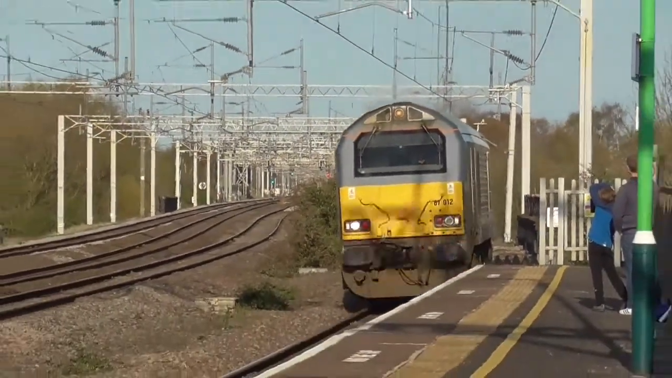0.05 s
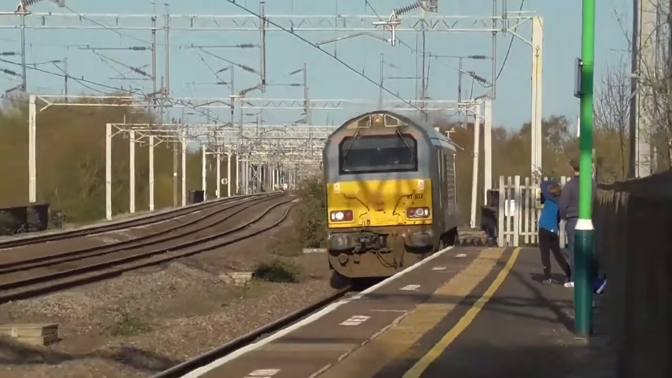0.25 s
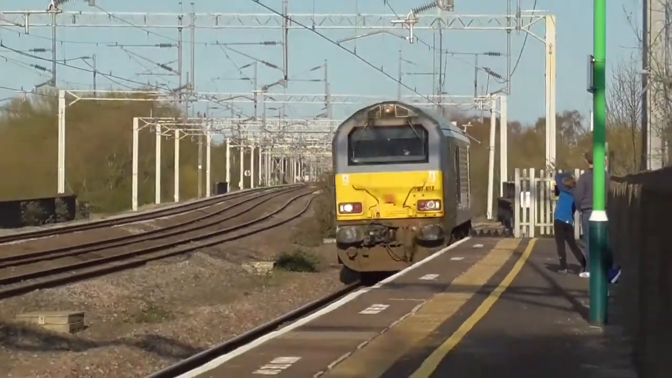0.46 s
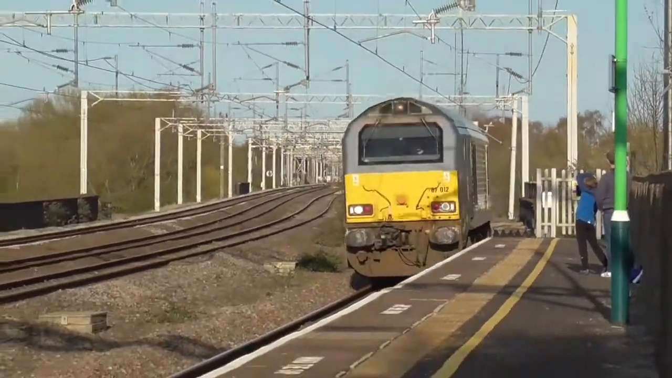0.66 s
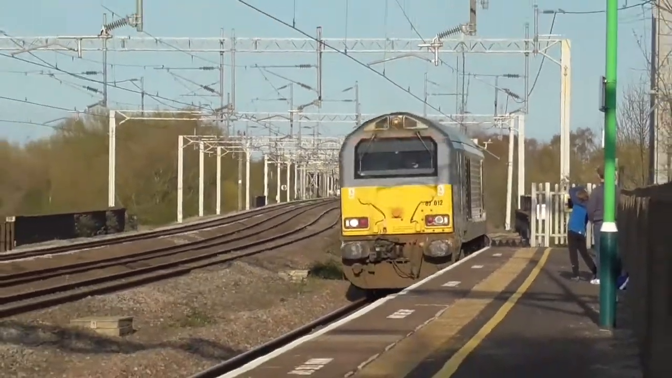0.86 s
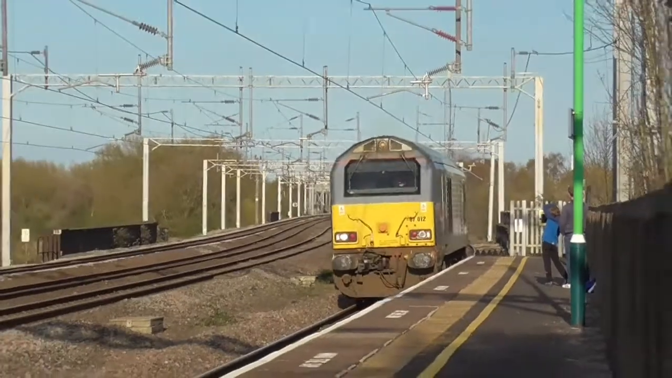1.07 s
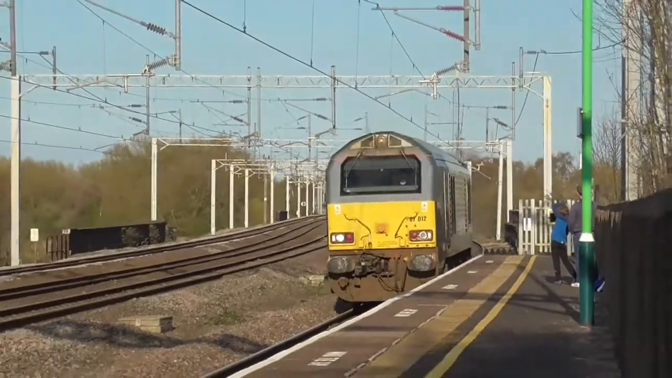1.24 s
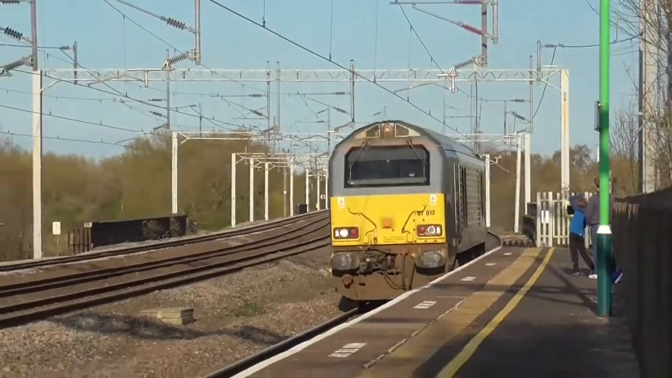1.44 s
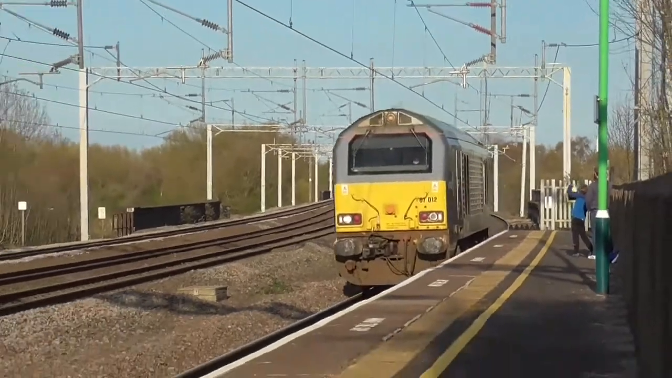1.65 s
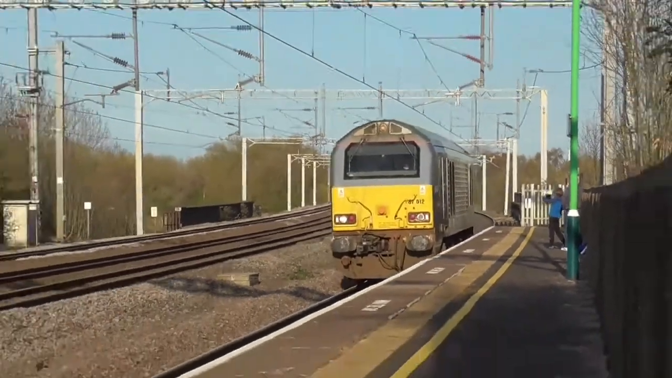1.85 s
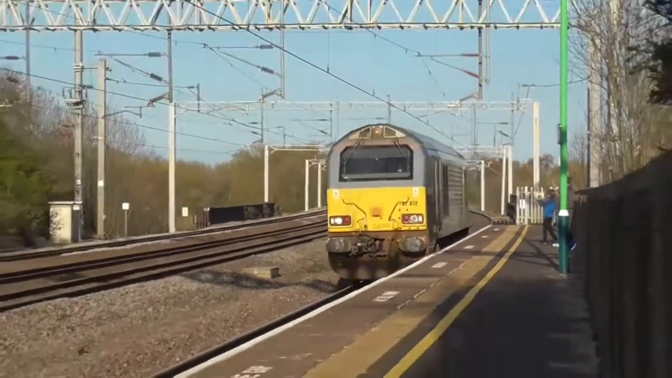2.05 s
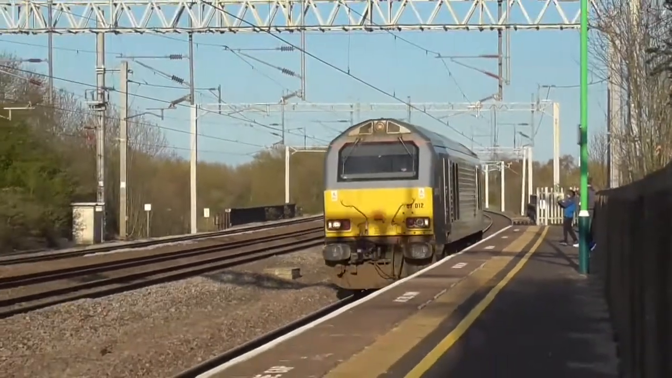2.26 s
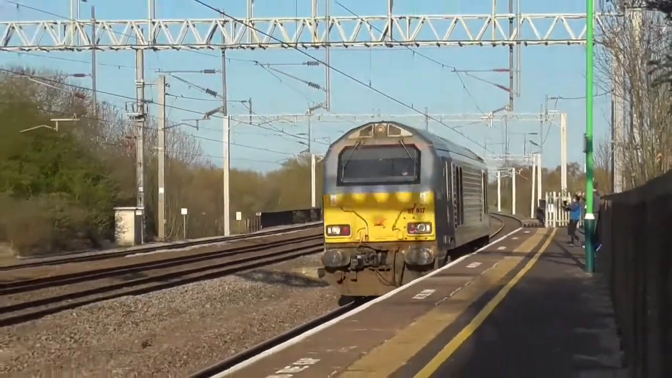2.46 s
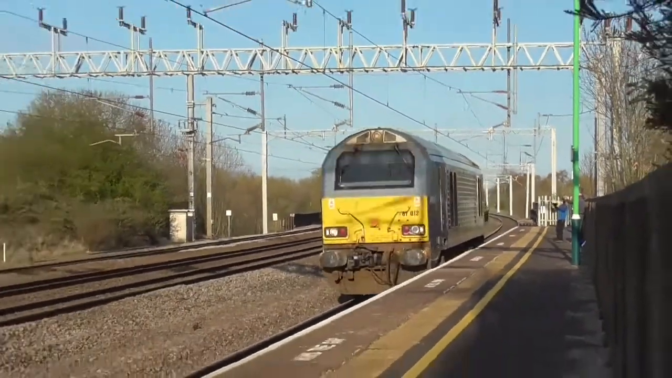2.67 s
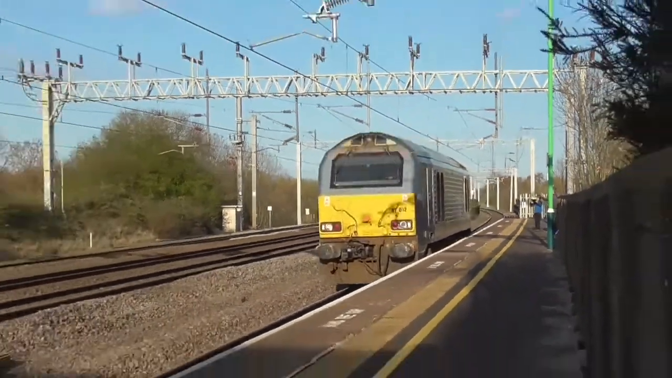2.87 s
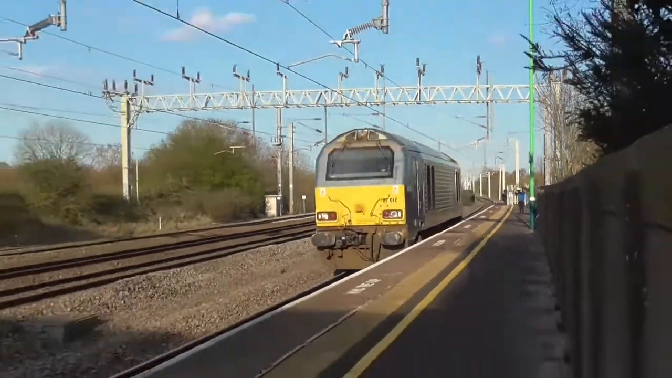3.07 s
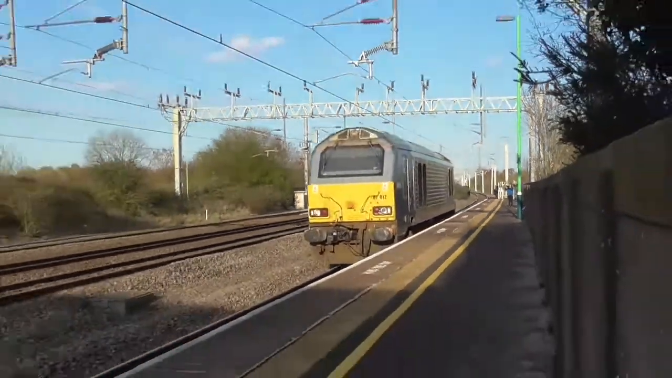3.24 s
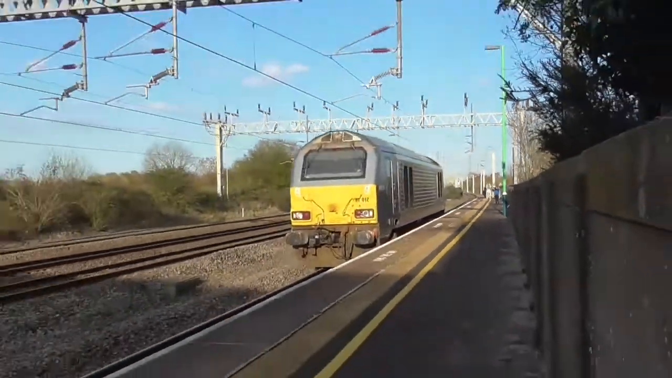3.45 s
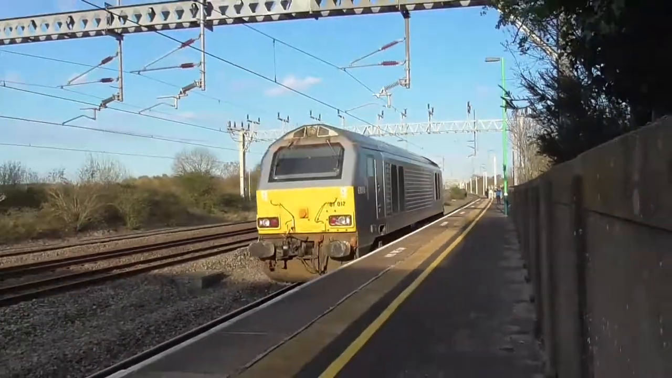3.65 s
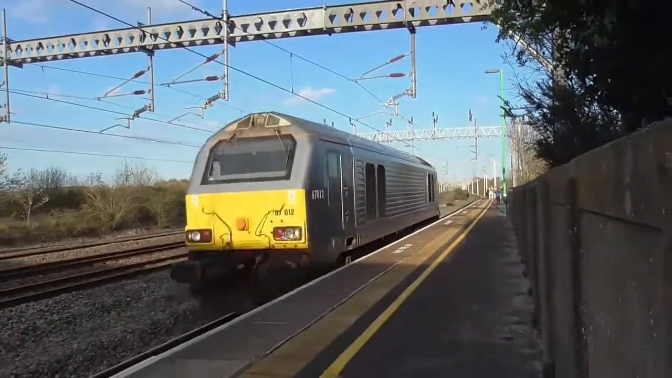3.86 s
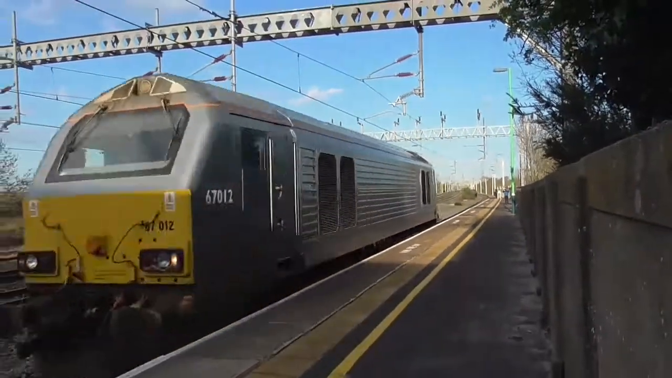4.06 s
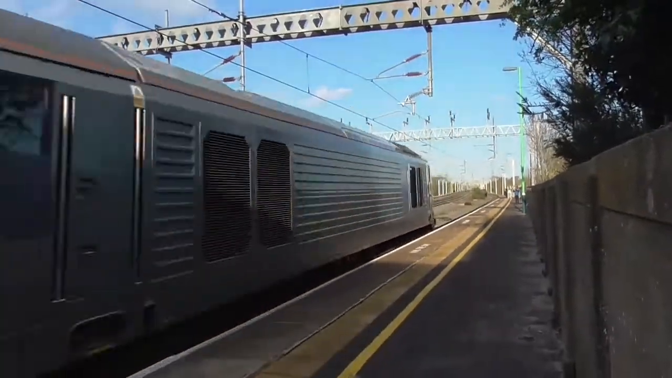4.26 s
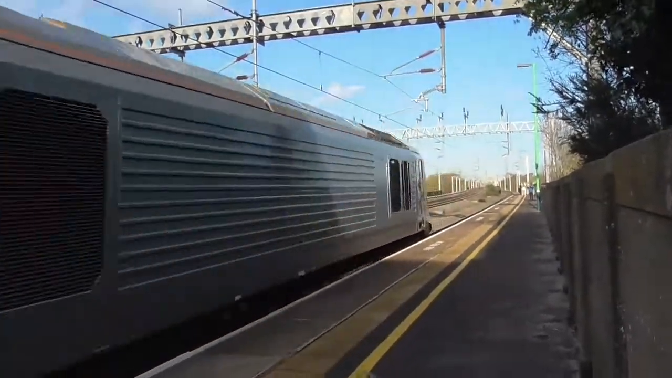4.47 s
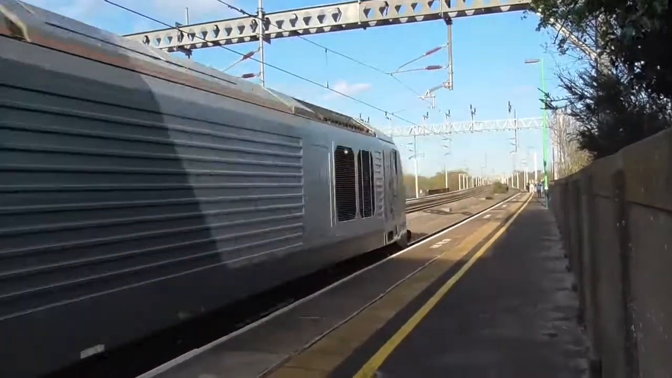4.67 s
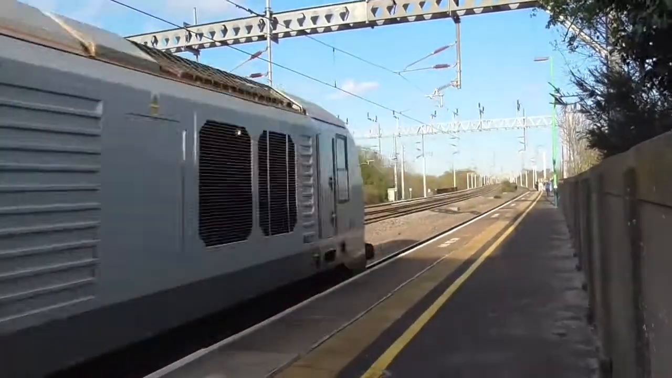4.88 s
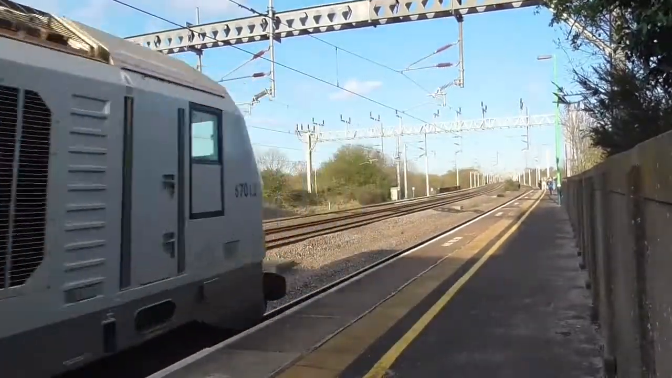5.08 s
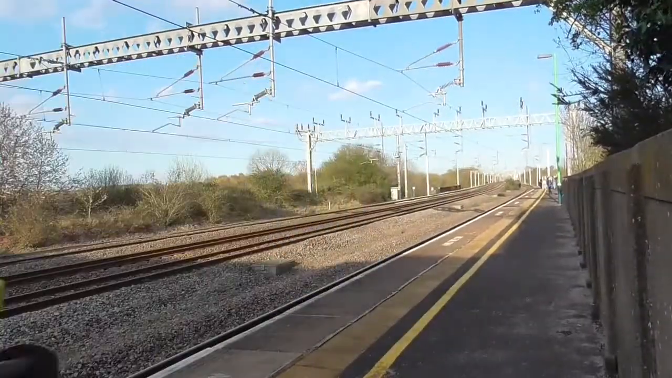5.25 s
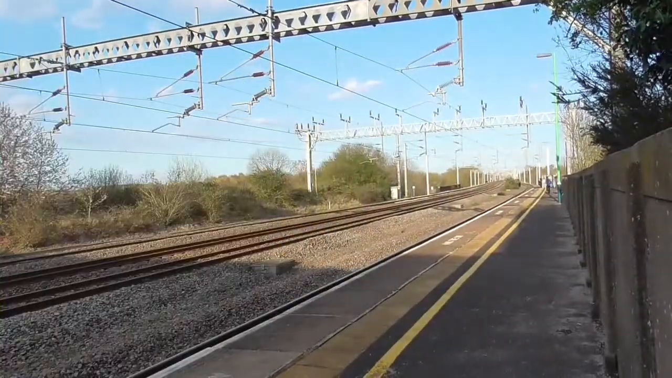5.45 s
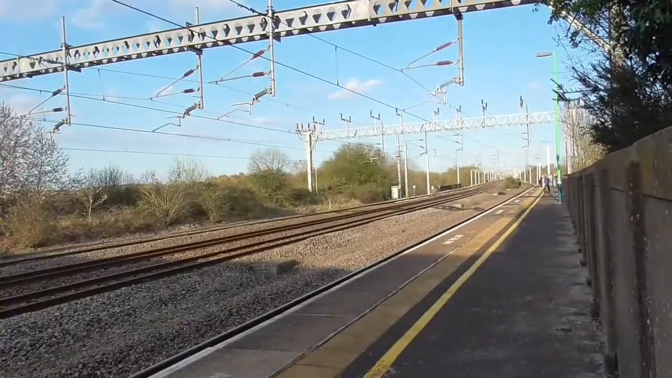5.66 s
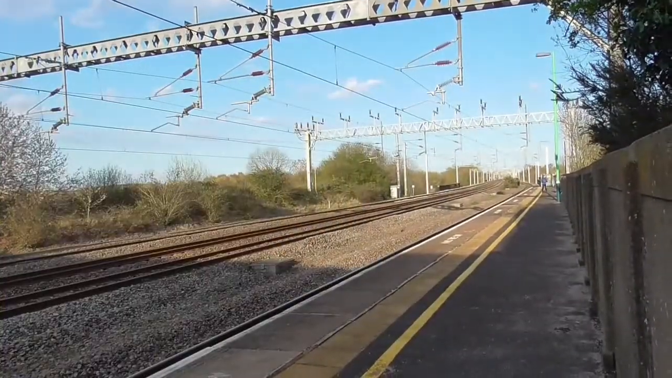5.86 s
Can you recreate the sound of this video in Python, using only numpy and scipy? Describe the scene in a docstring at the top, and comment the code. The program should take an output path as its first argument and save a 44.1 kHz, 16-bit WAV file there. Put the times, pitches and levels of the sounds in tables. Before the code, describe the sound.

Open-air station platform, fixed stereo microphone close to the track. From 0 s a distant diesel drone, rough and buzzing with a fast uneven pulse, sits over faint outdoor rumble; the rails hiss and sing high in short spells, at the start, near 1 s and around 2.7-3.3 s, with thin wavering whines. A small soft flange scrape comes at 1.4 s. Drone and rolling roar grow steadily, bass booming more from 2.5 s. At 3.7 s a strong bright metallic scrape and hiss bursts out; the engine dips briefly near 3.9 s. From 4.1 to 5 s the locomotive passes very close: throaty engine roar, rasping wheels, a low push of air, short scrapes at 4.2 and 4.5 s and a thin falling squeal. Around 5.1 s cooling fans roar broadly, their colour sinking. The exhaust drops in pitch, and by 5.5-6 s a lower, still strong drone recedes as wheel noise and hiss fall away.

```python
"""Diesel locomotive passing a platform

A two-stroke diesel locomotive rounds a curve and runs close past a listener on a station platform.
Its exhaust, a sum of crank orders, repeated pulses and puffing noise, drops in pitch by the Doppler effect.
Wheels roar and rasp as coloured noise; rails sing ahead as noise full of narrow resonances.
Flanges scrape in bright bursts, thin whines and a squeal are narrow random lines, and fans roar last."""
import sys
import numpy as np
from scipy.fft import rfft, irfft, next_fast_len
from scipy.io import wavfile
from scipy.ndimage import map_coordinates

SR = 44100
rng = np.random.default_rng(int(sys.argv[2]) if len(sys.argv) > 2 else 0)


def master(y):
    """Save y as 16-bit WAV."""
    cut = np.clip(np.atleast_2d(y).T, -1, 1)
    pcm = np.round(cut * 32767)  # scale
    wavfile.write(sys.argv[1], SR, pcm.astype(np.int16))


N = 260895
T = np.arange(N) / SR
SPEED_M_PER_S, SOUND_M_PER_S, CRANK_HZ = 18.3, 343, 5.712
STACK_S, STACK_M = 4.78, 5  # the exhaust stack draws level; its distance then

# All levels in the tables are relative; spectra give noise density.
# low exhaust orders: (multiple of crank speed, level [dB])
THROB_ORDERS = [(1, -37), (2, -35), (3, -36), (4, -35), (5, -32), (6, -14), (7, -20), (8, -20), (9, -4),
                (10, -12), (11, -4), (12, -13), (13, -4), (14, -18), (15, 0), (16, -4), (17, -16),
                (18, -18)]
# low orders that boom: (start [s], end [s], multiple of crank speed, lift [dB])
BOOMS = [(2.45, 3.35, 9, 7), (3.35, 6.5, 15, 7), (4.15, 4.95, 10, 8)]
# bass of the exhaust: (time [s], level [dB])
THROB_LEVEL = [(0.0, -39), (1.7, -31.5), (2.38, -30.5), (2.6, -26.5), (3.34, -26.5), (3.77, -18.5),
               (3.88, -32), (4.08, -29), (4.11, -20), (4.93, -25), (5.38, -22.5), (5.42, -27),
               (5.55, -20.5), (5.7, -29), (5.9, -26)]
# strong upper engine orders: (multiple of crank speed, level [dB])
DRONE_ORDERS = [(19, -2.5), (27, -5), (30, 2.5), (33, -17), (34, 1), (37, -14), (38, -5), (41, -7),
                (56, -11), (63, -2), (79, -2), (84, -7.5), (91, -6.5), (120, -37)]
# single orders that swell: (start [s], end [s], multiple of crank speed, level [dB], phase roughness [rad])
HUMS = [(1.45, 3.15, 79, -43, .3), (2.03, 2.45, 47, -36, 1), (2.83, 3.18, 48, -24, .3),
        (3.26, 3.42, 48, -21.5, .3), (3.25, 3.75, 38, -29.5, .5), (3.56, 3.76, 48, -22.5, .6),
        (4.1, 4.24, 47, -22.5, 1.3), (4.14, 4.26, 33, -24, 1), (4.33, 4.55, 48, -23, 1),
        (4.6, 4.72, 30, -22.5, .4), (4.79, 4.87, 50, -25, .5), (5.35, 5.75, 50, -28.5, .4)]
# exhaust noise: (frequency [Hz], level [dB per Hz])
EXHAUST_SPECTRUM = [(30, -41), (55, -10), (100, -3.5), (135, -5), (165, -2.5), (190, -1), (235, -4.5),
                    (280, -1.5), (350, -4.5), (420, -9), (520, -13), (800, -36)]
# ground reflection colouring the distant exhaust: (frequency [Hz], gain [dB])
GROUND_COLOUR = [(60, -3), (105, -28), (135, -20), (165, -5), (210, 0.5), (270, 3.5), (350, 2), (400, -2),
                 (450, -8.5), (550, 0)]
# exhaust heard from behind: (frequency [Hz], gain [dB])
BEHIND_COLOUR = [(130, -1.5), (190, -1), (270, -2.5), (335, -11), (400, -4), (460, -11), (600, 0)]
# brief changes of drone and roar: (start [s], end [s], change [dB])
DIPS = [(3.825, 4.075, -14), (4.23, 4.292, -4), (5.706, 5.905, 2.5)]
# rolling roar: (frequency [Hz], level [dB per Hz])
ROAR_SPECTRUM = [(220, -33), (380, -3), (470, 1.5), (620, -1.5), (730, -2.5), (900, -16.5), (1300, -14.5)]
# tread rasp: (frequency [Hz], level [dB per Hz])
RASP_SPECTRUM = [(500, -49), (780, -0.5), (930, -2.5), (1150, -4.5), (1400, -2.5), (1600, -17), (1900, -23),
                 (3000, -23)]
# wheel discs ringing in the curve: (frequency [Hz], level [dB per Hz])
DISC_SPECTRUM = [(560, -14), (660, -1.5), (720, 2.5), (800, -3), (940, 2), (1030, -3.5), (1120, -3.5),
                 (1300, -16), (1410, -8), (1550, -18)]
# that ringing: (time [s], level [dB])
DISC_LEVEL = [(0, -59), (1.15, -46.5), (1.52, -41.5), (1.8, -45.5), (2.7, -43.5), (3.3, -38.5), (3.76, -29),
              (4.15, -33), (4.5, -28.5), (5, -35.5), (5.5, -50)]
# middle ring of the rails: (frequency [Hz], level [dB per Hz])
RAIL_MIDDLE_SPECTRUM = [(1000, 5), (1800, 0), (2200, 6), (2750, -1), (3300, 4), (3700, 1), (4200, -1),
                        (4600, -0.5), (5500, -5.5), (8000, -5), (15000, -28)]
# rolling hiss on the rails: (frequency [Hz], level [dB per Hz])
RAIL_HISS_SPECTRUM = [(2650, -9), (4500, -1.5), (5600, -1.5), (6400, -1.5), (7020, 0), (7710, 2), (8720, 6),
                      (12500, -1.5), (15000, -12), (15500, -44)]
# high singing of the rails: (frequency [Hz], level [dB per Hz])
RAIL_SONG_SPECTRUM = [(5000, -25), (5900, -2), (6450, 3.5), (6950, 6), (7300, 3.5), (7700, -3.5),
                      (8800, -2), (10200, 3), (11500, 2), (12900, 4), (14000, -3), (15200, -18)]
# spells of singing: (start [s], end [s], level [dB])
SONGS = [(-.2, 0.294, -46.5), (0.87, 1.25, -49), (2.647, 3.37, -44)]
# middle resonance of wheel and rail: (frequency [Hz], level [dB per Hz])
RAIL_PEAK_SPECTRUM = [(2850, -4), (3150, -8), (3430, 4), (3700, -2), (3980, -28), (4350, 2), (4900, -20)]
# that resonance: (time [s], level [dB])
RAIL_PEAK_LEVEL = [(0, -76), (1.35, -62), (1.5, -52), (1.7, -56), (2.6, -59), (3.1, -64), (3.55, -43.5),
                   (4.1, -57), (4.5, -44), (5.1, -53), (5.6, -70)]
# thin whines of wheels and rails: (start [s], end [s], frequency [Hz], width [Hz], level [dB])
WHINES = [(-.3, .6, 824, 16, -49), (.58, 1.2, 831, 16, -45.5), (.68, 1.02, 800, 20, -48),
          (.75, 3.1, 560, 22, -45), (1.55, 1.68, 905, 20, -43), (1.8, 2.95, 842, 14, -44.5),
          (4.6, 5.02, 945, 20, -34.5), (.6, .8, 2130, 60, -62), (1.2, 2.7, 2215, 50, -65),
          (2.55, 3.05, 2223, 40, -55.5), (.38, .8, 6850, 180, -64), (.95, 1.6, 7130, 140, -67),
          (1.55, 2.3, 7170, 70, -60), (2.65, 3.15, 6930, 120, -58)]
# outdoor rumble: (frequency [Hz], level [dB per Hz])
AIR_SPECTRUM = [(22, -8), (35, -14), (70, 12), (130, -6), (400, -45)]
# flange scrapes: (start [s], rise [s], hold [s], fall by 60 dB [s], level [dB],
#                  grinding below 5 kHz [dB], edge at 5-7 kHz [dB])
SCRAPES = [(1.425, .07, .02, .6, -43, 5, -4), (3.73, .06, .15, .55, -19.2, -9.5, -25),
           (4.238, .012, .05, .22, -27, -16, -.5), (4.525, .025, .08, .7, -35.5, -5, -6),
           (4.96, .14, .03, .8, -42.5, -5, -5)]
# flange hiss, grinding and edge: (frequency [Hz], level [dB per Hz])
FLANGE_SPECTRUM = [(3000, -13), (4600, 1), (6000, -2), (7500, 5.5), (9300, 10.5), (11000, 9.5), (13000, 5),
                   (14500, -2), (15700, 1)]
GRIND_SPECTRUM = [(700, -14), (1100, -1), (1400, 5), (1850, -8), (2700, -5), (3400, 2), (3900, 2),
                  (5000, -3), (8000, -20)]
EDGE_SPECTRUM = [(4200, -12), (4700, 1), (6000, -1), (7300, 0), (9000, -12), (12000, -20)]
# engine-room roar: (frequency [Hz], level [dB per Hz])
THROAT_SPECTRUM = [(170, -6), (215, 2), (260, -4), (330, 2), (385, 4), (440, -13)]
# air shoved aside by the body: (frequency [Hz], level [dB per Hz])
WAKE_SPECTRUM = [(25, -4), (45, -3), (60, 8), (90, -13), (130, 1), (190, -5)]
# fits of a squealing wheel: (start [s], end [s], level [dB])
SQUEALS = [(4.12, 4.18, -49), (4.215, 4.275, -43), (4.275, 4.435, -48), (4.435, 4.51, -43.5),
           (4.51, 4.72, -49.5)]
# cooling fans: (frequency [Hz], level [dB per Hz])
FAN_SPECTRUM = [(330, -30), (420, 11), (470, 7), (540, 2), (620, 9), (720, 5), (850, -25), (1200, -13)]
# sinking band of ground reflection in the fans' roar: (time [s], frequency [Hz])
REFLECTION_SWEEP = [(4.8, 780), (5.0, 705), (5.2, 620), (5.4, 570)]
# left-right likeness of noise: (frequency [Hz], coherence)
COHERENCE = [(60, 0.87), (250, 0.95), (500, 0.76), (1000, 0.8), (2000, 0.64), (4000, 0.66), (8000, 0.087),
             (12000, 0.083)]
# left minus right: (frequency [Hz], level [dB])
LEFT_MINUS_RIGHT = [(60, -1.5), (140, 0.6), (210, -0.4), (330, 0.9), (500, 4), (770, 0.2), (1170, 2),
                    (1790, 0.8), (6410, 0.7), (9810, 1.5), (15000, -4)]
# passes: (time level [s], nearest distance [m], level there [dB],
#          fall per tenfold distance [dB], change far past [dB])
EXHAUST_PASS = (4.05, 10.5, -16.5, 20, -2.5)
GAS_PASS = (5.5, 17, -22, 18.5, 5)
FRONT_ROAR_PASS = (4, 3.5, -28, 25, -7)
REAR_ROAR_PASS = (5, 9.5, -23, 24.5, 2.5)
RASP_PASS = (5, 12.5, -27.5, 24, -5.5)
RING_PASS = (4.5, 11.5, -38, 27, 2)
HISS_PASS = (4, 14.5, -39.5, 34, -8)
WAKE_PASS = (5, 6, -28, 40, 0)


def amp(db):
    """Logarithmic measure: decibels to gain."""
    return np.exp(np.asarray(db) * (np.log(10) / 20))


def unit(x):
    """Normalisation to an rms of 1."""
    return x / np.sqrt(np.mean(x ** 2) + 1e-20)


def along(points, hz):
    """Interpolation of (frequency, value) points on a logarithmic frequency axis."""
    f, v = np.transpose(points)
    return np.interp(np.log(hz + 1), np.log(f + 1), v)


def over_time(points):
    """Linear interpolation of (time, value) points."""
    return np.interp(T, *np.transpose(points))


def wobble(rate):
    """Band-limited random modulation: a smooth curve with rate knots a second."""
    coarse = T[::64]
    knots = rng.standard_normal(int(T[-1] * rate) + 4)
    return np.interp(T, coarse, map_coordinates(knots, [coarse * rate]))


def spell(start, end, edge_s):
    """Soft gating: a window near 1 between start and end."""
    return (np.tanh((T - start) / (2 * edge_s)) - np.tanh((T - end) / (2 * edge_s))) / 2


def filtered(x, response):
    """Linear filtering: the spectrum of x times a response of frequency."""
    m = next_fast_len(N + SR // 4)
    return irfft(rfft(x, m) * response(np.fft.rfftfreq(m, 1 / SR)), m)[..., :N]


def rush(spectrum, ripple_db, spacing_hz):
    """Resonant colouring of stereo noise: a spectrum with random close ripples; its mid has rms 1."""
    def response(hz):
        """Partial coherence: gains of mid and side."""
        ripple = np.interp(hz / spacing_hz, np.arange(4096), rng.standard_normal(4096))
        upper_skirt = 1 / (1 + (hz / spectrum[-1][0]) ** 4)
        lower_skirt = 1 / (1 + (spectrum[0][0] / (hz + 1)) ** 4)
        turn = np.arccos(np.clip(along(COHERENCE, hz), -1, 1)) / 2
        colour = upper_skirt * lower_skirt * amp(along(spectrum, hz) + ripple_db * ripple)
        return colour * np.array([np.cos(turn), np.sin(turn)])
    mid, side = filtered(rng.standard_normal((2, N)), response)
    return np.array([mid + side, mid - side]) / np.std(mid)


def narrow(pitch, width_hz, clean):
    """Random modulation of a carrier: a fuzzy stereo line of rms 1; clean is steady tone against fuzz."""
    phase = (2 * np.pi * (np.cumsum(pitch + 0 * T) / SR % 1)).astype(np.float32)

    def line(steady):
        """Quadrature modulation of one carrier."""
        return (steady + wobble(width_hz)) * np.cos(phase) + wobble(width_hz) * np.sin(phase)
    mid, side = line(clean), line(0)
    return unit(np.array([mid + side / 2, mid - side / 2]))


def passing(level_s, reach_m, db, fall_db, past_db):
    """Spreading loss and directivity: gain falls with distance and differs ahead and behind."""
    along_m = SPEED_M_PER_S * (T - level_s)
    distance_m = np.hypot(along_m, reach_m)
    spreading_db = -fall_db * np.log10(distance_m / abs(reach_m))
    return amp(db + spreading_db + past_db * np.maximum(along_m / distance_m, 0))


def receding(level_s=STACK_S, reach_m=STACK_M):
    """Radial velocity: share of the speed pointing away, -1 far ahead, 1 far past."""
    along_m = SPEED_M_PER_S * (T - level_s)
    return along_m / np.hypot(along_m, reach_m)


def doppler(x, level_s, reach_m):
    """Doppler effect: travel time shrinks, then grows, so the pitch of a steady noise sinks."""
    delay = np.hypot(SPEED_M_PER_S * (T - level_s), reach_m) / SOUND_M_PER_S
    return np.array([np.interp((T - delay) % T[-1], T, channel) for channel in x])


def place(x, width_db):
    """Time-difference stereo: width scales the side; the sound leaves left, reaching that microphone first."""
    mid = (x[0] + x[1]) / 2
    side = (x[0] - x[1]) / 2 * amp(width_db)
    lag = np.interp(T, [4.3, 5.4], [0, 4e-5]) * SR  # right channel, in samples
    return np.array([mid + side, map_coordinates(mid - side, [np.arange(N) - lag])])


def crank_angle():
    """Doppler-shifted rotation: crank angle [rad] as heard, zero when the strongest cylinder fires."""
    turns = np.cumsum(CRANK_HZ / (1 + receding() * SPEED_M_PER_S / SOUND_M_PER_S)) / SR
    strongest_s = .962
    return 2 * np.pi * (turns - np.interp(strongest_s, T, turns))


def throb(angle):
    """Harmonic summation: uneven cylinders swell the low orders once a turn; close by, single orders boom."""
    scatter = np.interp(T, [2, 3.5], [.35, 1.1])  # phase wander [rad]
    wave, power = np.zeros((2, N)), np.zeros(N)
    for k, db in THROB_ORDERS:
        lift = sum(lift_db * spell(start, end, .08) for start, end, multiple, lift_db in BOOMS
                   if multiple == round(k))
        gain = amp(db + lift)
        lag = rng.normal(0, .85) + scatter * wobble(1.2) + .2 * wobble(7)
        lag = lag + .2 * rng.standard_normal((2, 1))  # differs between the ears
        wave += gain * np.cos((round(k) * angle + lag).astype(np.float32))
        power += gain ** 2 / 2
    return amp(1.5) * wave / np.sqrt(power)


def tone(angle, multiple, waver_db, drift):
    """Multipath interference: shifting reflections make one engine order waver in level and phase."""
    phase = round(multiple) * angle + drift * wobble(3.04) + rng.uniform(0, 2 * np.pi)
    return np.sqrt(2) * amp(waver_db * wobble(2.93)) * np.cos(phase)


def bark(angle, spectrum, count=3, size=4096):
    """Periodic excitation: one turn's ragged pressure pattern repeats by several slowly changing paths."""
    hz = np.arange(size // 2 + 1) * CRANK_HZ / (1 - SPEED_M_PER_S / SOUND_M_PER_S)
    pipe = amp(along(spectrum, hz)) * (hz > 105) * (hz < spectrum[-1][0])
    out = np.zeros((2, N))
    for _ in range(count):
        cycle = irfft(pipe * np.exp(2j * np.pi * rng.random(len(hz))))
        wave = np.interp(angle / (2 * np.pi) % 1, np.arange(size) / size, cycle)
        out += wave * (1 + 0.34 * wobble(2.986) + 0.25 * np.array([wobble(2.335), wobble(2.0)]))
    return unit(out)


def engine(roar, dip):
    """Pulsed radiation: throb, drone, clatter, and gas puffing at each of twelve firings a turn."""
    angle = crank_angle()
    near_m, blend_m = 44, 13.4  # ground colour fades inside this distance, over this scale
    stack_along_m = SPEED_M_PER_S * np.abs(T - STACK_S)
    near = (1 + np.tanh((near_m - stack_along_m) / (2 * blend_m))) / 2
    drone = unit(sum(amp(db) * tone(angle, k, waver_db=1.5, drift=0.6) for k, db in DRONE_ORDERS))
    firing = np.cos(12 * angle)
    turbulence = rush(EXHAUST_SPECTRUM, ripple_db=3.5, spacing_hz=8.8)
    gas = passing(*GAS_PASS) * turbulence * (1 + 0.5 * firing)
    pulses = amp(-6.5) * drone + amp(-2.5) * bark(angle, EXHAUST_SPECTRUM)
    exhaust = passing(*EXHAUST_PASS) * pulses + gas
    distant = filtered(exhaust, lambda hz: amp(along(GROUND_COLOUR, hz)))
    behind = filtered(exhaust, lambda hz: amp(along(BEHIND_COLOUR, hz)))
    past = np.maximum(receding(), 0) ** 2
    exhaust = (1 - past) * exhaust + past * behind
    clatter = amp(-4.0) * roar * bark(angle, ROAR_SPECTRUM)
    # the bass follows its own level curve, dipping near 4 s; drone and clatter dip together
    bass = amp(-2 + over_time(THROB_LEVEL)) * throb(angle)
    return bass + dip * (near * exhaust + (1 - near) * distant + clatter + hums(angle))


def wheel_roar(roar):
    """Roughness excitation: rolling shakes wheels and sleepers."""
    noise = rush(ROAR_SPECTRUM, ripple_db=2.5, spacing_hz=14)
    return roar * amp(-1.84 + 0.32 * wobble(13)) * doppler(noise, level_s=4.8, reach_m=6)


def wheel_rasp():
    """Contact noise: treads rasp on the rail heads, brightest at close range."""
    bright_m, brightest_s = 10, 4.33  # the middle of the locomotive draws level
    dull_hz = 1050
    level = np.hypot(passing(*RASP_PASS), amp(-3.5) * passing(*FRONT_ROAR_PASS))
    rasp = level * amp(1.1 * wobble(18)) * rush(RASP_SPECTRUM, ripple_db=1.9, spacing_hz=21.78)
    dull = filtered(rasp, lambda hz: 0.51 + 0.33 / (1 + (hz / dull_hz) ** 10))
    close = np.exp(-(SPEED_M_PER_S * (T - brightest_s) / bright_m) ** 2)
    return close * rasp + (1 - close) * dull


def wheel_discs():
    """Structural resonance: the wheel discs ring, most strongly around the flange scrapes."""
    return amp(over_time(DISC_LEVEL)) * rush(DISC_SPECTRUM, ripple_db=3.0, spacing_hz=18)


def blurring(spectrum, ripple_db, spacing_hz):
    """Power-preserving crossfade: narrow rail resonances melt into an even rush once the wheels are close."""
    turn = np.pi / 2 * np.interp(T, [3.6, 4.5], [0, 1])
    resonant = rush(spectrum, ripple_db, spacing_hz)
    even = rush(spectrum, 0.93, spacing_hz)
    return np.cos(turn) * resonant + np.sin(turn) * even


def rails():
    """Structure-borne sound: steel carries hiss far ahead through narrow resonances that sing in spells."""
    singing = sum(amp(db) * spell(start, end, 0.056) for start, end, db in SONGS)
    ring = passing(*RING_PASS) * amp(1.2 * wobble(18))
    ring = ring * blurring(RAIL_MIDDLE_SPECTRUM, ripple_db=3.0, spacing_hz=35.46)
    hiss = np.hypot(passing(*HISS_PASS), amp(-4) * singing) * amp(0.4 * wobble(23.1))
    hiss = hiss * blurring(RAIL_HISS_SPECTRUM, ripple_db=4.0, spacing_hz=32.0)
    song = (amp(-60.5) + singing) * amp(1.8 * wobble(35))  # faint singing between spells
    song = song * rush(RAIL_SONG_SPECTRUM, ripple_db=4.5, spacing_hz=36.4)
    peak_noise = rush(RAIL_PEAK_SPECTRUM, ripple_db=2.5, spacing_hz=39.9)
    peak_gain = amp(over_time(RAIL_PEAK_LEVEL) + 1.8 * wobble(20))
    return ring + hiss + song + peak_gain * doppler(peak_noise, level_s=4.7, reach_m=5)


def whines():
    """Narrow-band vibration: thin, unsteady tones swell and fade."""
    out = np.zeros((2, N))
    for start, end, hz, width_hz, db in WHINES:
        progress = np.clip((T - start) / (end - start), 0, 1)
        swell = np.sqrt(np.abs(np.sin(np.pi * progress)))
        out += swell * amp(db) * narrow(hz, width_hz, clean=1.5)
    return out


def air():
    """Diffuse background: a faint outdoor rumble, different at each microphone."""
    return amp(-47) * unit(place(rush(AIR_SPECTRUM, ripple_db=-4, spacing_hz=22), 12))


def flanges():
    """Frictional excitation: a flange bites the rail head, hisses and grinds, then rings away."""
    hiss, grind, edge = np.zeros((3, N))
    for start, rise, hold, fall, db, grind_db, edge_db in SCRAPES:
        decay_db = 60 * np.maximum(T - start - rise - hold, 0) / fall
        contact = np.clip((T - start) / rise, 0, 1) ** 2 * amp(db - decay_db)
        hiss += contact
        edge += contact * amp(edge_db)
        grind += contact * amp(grind_db)
    sound = hiss * rush(FLANGE_SPECTRUM, ripple_db=3.0, spacing_hz=45.9)
    sound += grind * rush(GRIND_SPECTRUM, ripple_db=2.5, spacing_hz=40.46)
    sound += edge * rush(EDGE_SPECTRUM, ripple_db=3.5, spacing_hz=45.0)
    flutter = amp(.6 * wobble(60))
    return amp(-3.0) * sound * flutter


def hums(angle):
    """Amplitude and phase modulation: single orders stand out of the drone for a moment, fluttering."""
    out = np.zeros(N)
    for start, end, multiple, db, rough in HUMS:
        phase = multiple * angle + rough * wobble(30) + rng.uniform(0, 2 * np.pi)
        level = amp(db + 3 * np.tanh(wobble(24.02))) * spell(start, end, .015)
        out += level * np.sqrt(2) * np.cos(phase.astype(np.float32))
    return out


def engine_room():
    """Aperture radiation: a throaty roar spills from the side grilles as they come level."""
    level = amp(-24.5 + 1.7 * wobble(25)) * spell(4.1, 4.5, .02)
    return level * rush(THROAT_SPECTRUM, ripple_db=3, spacing_hz=12)


def wake():
    """Displacement flow: the push of air as the body goes by."""
    push = passing(*WAKE_PASS) * rush(WAKE_SPECTRUM, ripple_db=0.0, spacing_hz=22)
    return place(push, 3) * spell(4.1, 4.94, .04)


def squeal():
    """Doppler-shifted narrow band: one wheel squeals in fits and its pitch sinks as it draws level."""
    away = receding(level_s=4.8, reach_m=4.2)
    pitch = 7755 / (1 + away * SPEED_M_PER_S / SOUND_M_PER_S)
    fits = sum(amp(db) * spell(start, end, .007) for start, end, db in SQUEALS)
    return fits * narrow(pitch, width_hz=150, clean=1.1)


def radiator():
    """Ground reflection: fans roar as the rear grilles pass; two broad bands of reflected roar sink in pitch."""
    middle_s, half_length_s = 5.135, 0.26
    facing = np.exp(-((T - middle_s) / half_length_s) ** 2)
    centre = over_time(REFLECTION_SWEEP)
    reflected = narrow(centre, width_hz=70, clean=0) + narrow(.7 * centre, width_hz=70, clean=0)
    fans = doppler(rush(FAN_SPECTRUM, ripple_db=2.0, spacing_hz=14), level_s=5.1, reach_m=2.464)
    return facing * (amp(-24) * fans + amp(-26) * reflected)


def scene():
    """Superposition: the locomotive and its track, heard from the platform."""
    dip_db = sum(db * spell(start, end, 0.029) for start, end, db in DIPS)
    dip = amp(dip_db)
    width_db = 5.5 * (1 + receding()) / 2  # stereo width grows from ahead to past
    roar = np.hypot(passing(*FRONT_ROAR_PASS), passing(*REAR_ROAR_PASS))
    body = engine(roar, dip) + radiator()
    body = body + dip * (wheel_roar(roar) + wheel_discs() + engine_room())
    body = body + amp(0.38 * dip_db) * wheel_rasp()
    track = rails() + flanges() + whines() + squeal()
    return place(body, width_db) + place(track, .5 * width_db) + air() + wake()


def record(dry):
    """Transducer response: two microphones differ a little in colour; nothing passes above the band limit."""
    top_hz = 15700
    halves = np.array([[.5], [-.5]])  # each side takes half the difference
    return filtered(dry, lambda hz: amp(along(LEFT_MINUS_RIGHT, hz) * halves) * (hz < top_hz))


dry = scene()
out = record(dry)
master(out)
```